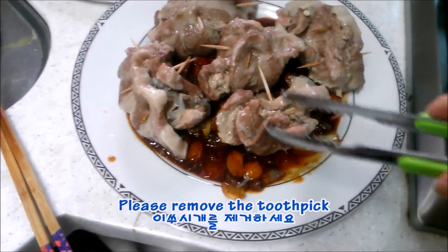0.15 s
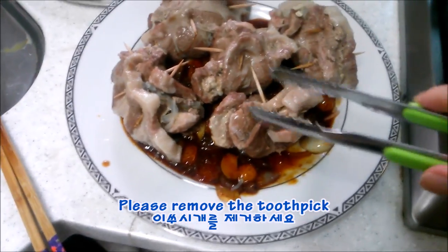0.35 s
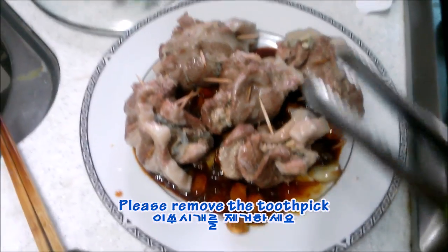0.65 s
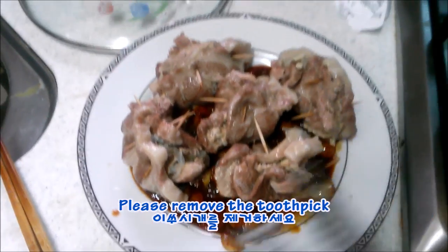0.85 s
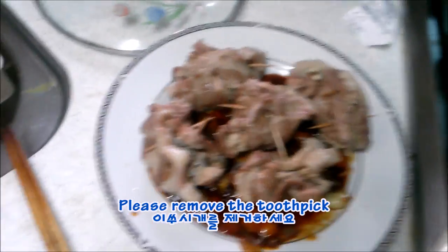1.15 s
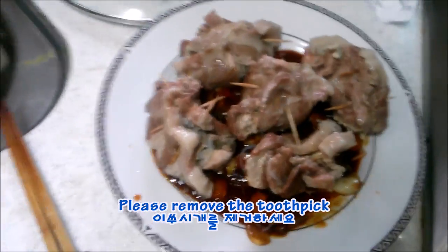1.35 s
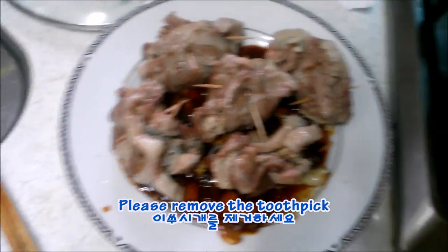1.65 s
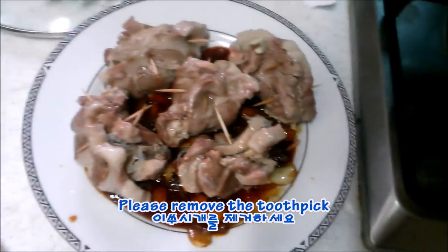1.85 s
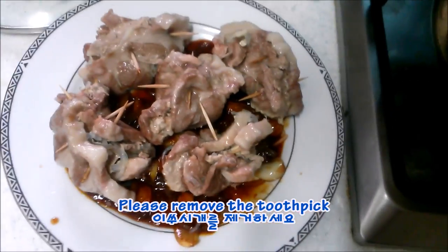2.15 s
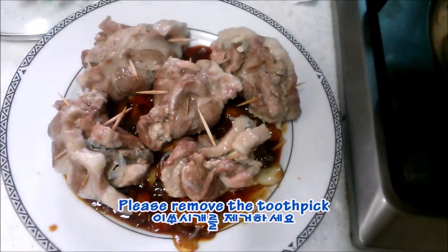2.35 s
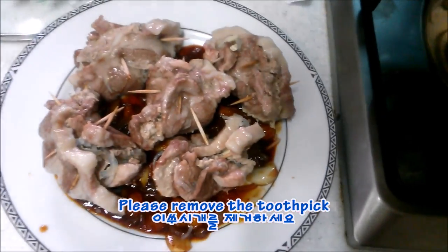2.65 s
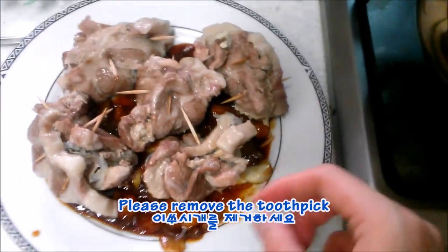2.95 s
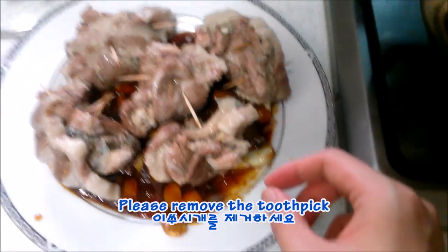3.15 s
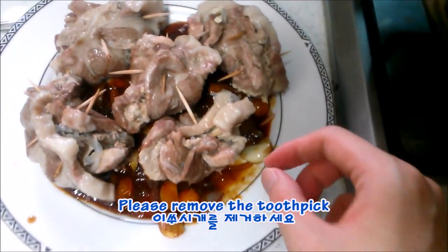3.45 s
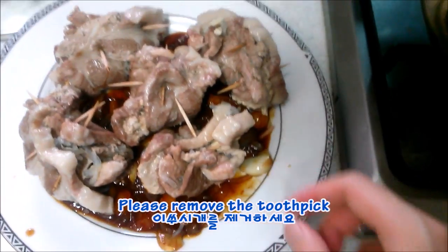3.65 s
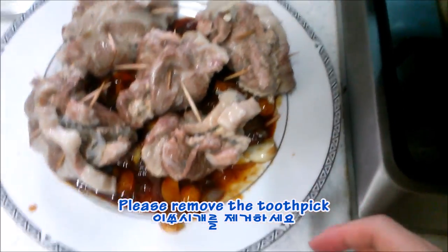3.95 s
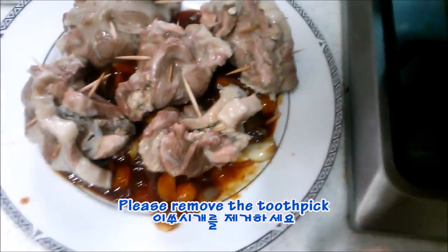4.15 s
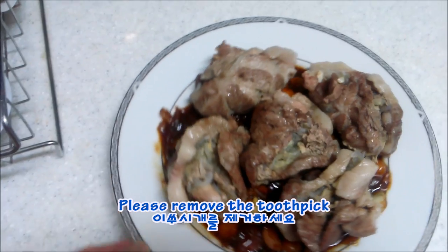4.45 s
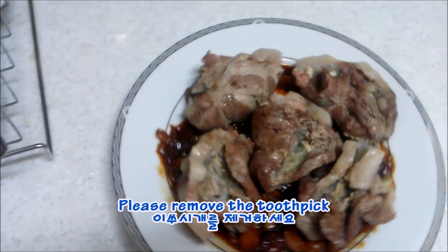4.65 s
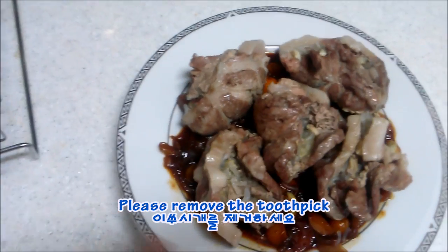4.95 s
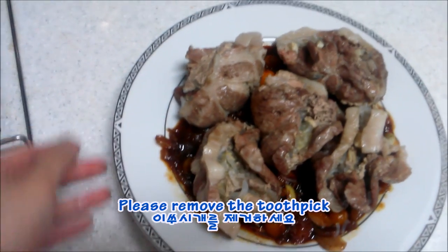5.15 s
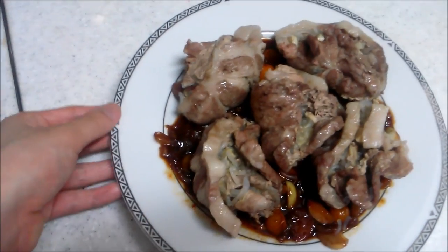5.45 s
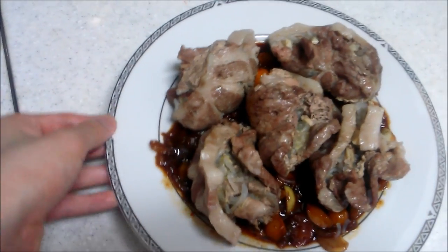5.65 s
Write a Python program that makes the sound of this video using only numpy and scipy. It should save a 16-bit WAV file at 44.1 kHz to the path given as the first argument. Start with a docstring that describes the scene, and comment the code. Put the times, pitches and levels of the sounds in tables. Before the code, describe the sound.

A small, hard-walled kitchen heard up close on a handheld microphone, with soft room air, low handling rumble and a very faint wavering appliance hum. At 0.2 s metal tongs give a faint springy click, and at 0.5 s they lightly nudge a dish. From 1.7 to 2.4 s they are laid aside in a light, uneven clatter that grows duller, with small clicks until 2.7 s. A quiet stretch follows. At about 4.15 s come loud dry pops with a low swing, then boxy knocks on the microphone's case; the hum vanishes. From 4.3 to 4.85 s a ceramic plate's rough foot grinds across the counter, with scratchy catches. Around 5.1 s it knocks hard several times, bright and short, with a thud. A hissing slide follows until 5.5 s, with two sharp rim taps at 5.3 s. Tiny scrapes at 5.6 and 5.76 s end it as the background fades.

```python
"""A small kitchen, close up: steel tongs click, nudge a dish and are laid aside with a light clatter
over an appliance hum. Dry pops and a low swing sound as the hum drops out, the microphone's case is knocked,
and a loaded ceramic plate is turned on the counter: its foot scrapes, catches, knocks and slides to rest.
Blows are filtered noise bursts, many with decaying modes; friction is noise modulated by random slips;
the hum is a set of wavering sines."""
import sys
import numpy as np
from scipy import signal
from scipy.fft import rfft, irfft
from scipy.io import wavfile
from scipy.ndimage import uniform_filter1d

SR = 44100
rng = np.random.default_rng(int(sys.argv[2]) if len(sys.argv) > 2 else 0)


def inscribe(sig):
    """Save sig as 16-bit PCM at rate SR to the path in sys.argv[1].

    A 1-D sig is mono; a 2-D sig holds one channel per row.
    Samples are clipped to [-1, 1] before scaling.
    """
    pcm = np.round(np.clip(np.atleast_2d(sig).T, -1, 1) * 32767)
    wavfile.write(sys.argv[1], SR, pcm.astype(np.int16))


N = 256485
T = np.arange(N) / SR  # s
AGE = T[:SR]  # time since a blow, s

# Spectrum of the room air. Each row: frequency in Hz, relative level in dB.
AIR_SPECTRUM = [(40, -21.5), (90, -0.5), (158, -7.5), (260, -8), (400, -8.5), (520, -14.5), (820, -15.5),
                (1100, -11), (1500, -16), (3000, -22), (6000, -29.5), (7600, -28.5), (10000, -41.5),
                (16000, -43.5)]
# Partials of the appliance hum. Each row: mean frequency in Hz, central level in dB.
HUM_PARTIALS = [(296, -78), (371, -71), (1104, -80), (1184, -85), (1287, -85), (2950, -87), (3009, -83)]
# Shifts of the hand that holds the microphone. Each row: middle in seconds, half length in seconds,
# rumble level in dB.
HAND_MOVES = [(0.43, 0.25, -53.5), (1.34, 0.36, -52.5), (2.146, 0.31, -49), (4.294, 0.21, -44),
              (5.193, .11, -46.5)]
# Spectrum of the handling rumble. Each row: frequency in Hz, relative level in dB.
RUMBLE_SPECTRUM = [(10, -4), (25, 6), (55, -5), (90, -17.5), (200, -22.5), (600, -51)]
HAND_REST_DB = -59  # rumble of the steady hand
RUSTLE_DB = -11  # airy rustle of a move, relative to its rumble
AIR_DB, AIR_SAG_DB_PER_S = -61.5, .5  # room air at the start, and its slow sinking
HUM_END_S, AIR_DROP_DB = 4.17, -2  # from here no hum is heard and the air is quieter
FADE_START_S, FADE_DB_PER_S = 5.46, 49  # the background dies away at the end

# Springy clicks of the tongs. Each row: start in seconds, level in dB, low-pass cutoff in Hz, T60 in seconds.
CLICKS = [(0.158, -48, 15000, 0.57), (1.972, -58.5, 11700, 0.58), (2.645, -60, 15400, 0.6),
          (2.717, -53, 7600, 0.64)]
# Spectrum of a click. Each row: frequency in Hz, relative level in dB.
CLICK_SPECTRUM = [(400, -18), (1100, -1), (2000, -2), (4500, -1.5), (6000, -3.5), (7600, 3), (9000, -3.5),
                  (10200, -9), (12000, -19), (16000, -20)]

# Tongs nudging the dish. Each row: start in seconds, level in dB, low-pass cutoff in Hz, T60 in seconds.
NUDGES = [(0.521, -53, 12000, 0.15), (0.528, -50, 9000, 0.2), (0.548, -52.5, 3060, 0.16)]
# Spectrum of a nudge. Each row: frequency in Hz, relative level in dB.
NUDGE_SPECTRUM = [(200, -29), (750, -1), (1050, -11), (1600, 5.5), (2250, -6), (3000, -8), (4500, -16),
                  (7500, -15.5), (10000, -27), (16000, -33)]
# Modes of the nudged dish. Each row: frequency in Hz, mean relative level in dB, free T60 in seconds.
NUDGE_MODES = [(806, -9, 0.22), (1630, -5, 0.22), (2086, 0, .2), (2305, -6, .15), (2835, -2, 0.11)]

# Tongs set down and rocking. Each row: start in seconds, level in dB, low-pass cutoff in Hz.
CLACKS = [(1.706, -36, 12100), (1.719, -35.5, 4900), (1.7806, -40.5, 3720), (1.799, -38, 1190),
          (1.8574, -42, 3120), (1.9288, -42, 2070), (1.945, -41, 1670), (1.9707, -39, 2400),
          (1.99, -41, 1280), (2.0714, -41, 2300), (2.089, -42, 1900), (2.128, -45, 900), (2.163, -44, 1300),
          (2.3358, -46.5, 1500), (2.3688, -42.5, 2030), (2.393, -41, 1180)]
# Spectrum of a clack. Each row: frequency in Hz, relative level in dB.
CLACK_SPECTRUM = [(120, -47), (220, -4.5), (310, -4.5), (520, -5.5), (660, -8), (1000, -6.5), (1300, -11),
                  (1700, -4), (2200, -11.5), (3100, -9), (3800, -16), (4600, -14.5), (7000, -17.5),
                  (16000, -40)]
# Modes of the tongs and their rest. Each row: mean frequency in Hz, mean relative level in dB,
# free T60 in seconds.
TONG_MODES = [(315, -4, .17), (463, -8, .17), (657, -5, .18), (708, -8, .15), (1060, -10, .1),
              (1565, -4, .09), (1712, -1, .07), (1946, 0, .08), (2060, -1, .08), (2336, -4, .08),
              (2692, -6, .1), (2900, -4, .07), (3074, -1, .08), (4398, -11, .11), (4721, -12, .11),
              (5125, -14, .08), (6842, -16, .08)]
CLACK_T60_S = .12

# Dry pops. Each row: start in seconds, level in dB, T60 of the fizz in seconds.
POPS = [(4.1263, -36.5, .008), (4.146, -17, 0.0047), (4.166, -8.5, 0.012)]
# Spectrum of a pop. Each row: frequency in Hz, relative level in dB.
POP_SPECTRUM = [(200, -10), (1500, -3), (2500, -10), (3800, 2), (7000, -2), (10000, -13.5), (16000, -15)]

# Knocks on the microphone's case. Each row: start in seconds, level in dB, low-pass cutoff in Hz,
# T60 in seconds.
CASE_KNOCKS = [(4.178, -18.5, 14000, 0.045), (4.186, -22.5, 11000, 0.28), (4.222, -22, 9000, 0.1),
               (4.229, -26.5, 6000, 0.18), (4.243, -25.5, 12500, 0.21), (4.267, -33, 1510, 0.29)]
# Spectrum of a case knock. Each row: frequency in Hz, relative level in dB.
CASE_SPECTRUM = [(25, -18), (60, 0.5), (112, 5.5), (150, -14), (190, -5), (270, -12), (330, -3.5),
                 (400, -14.5), (760, -6.5), (1300, -15.5), (2200, -16), (4500, -14.5), (8000, -18.5),
                 (11000, -32), (16000, -39)]
# Modes of the case. Each row: mean frequency in Hz, mean relative level in dB, free T60 in seconds.
CASE_MODES = [(100, -1, .16), (121, -1, .18), (188, 0, .22), (232, -2, .2), (319, -1, .22), (360, -7, .16),
              (410, -8, .15), (469, -3, .22), (553, -4, .22), (650, -9, .15), (721, -7, .18),
              (744, -8, .16), (879, -6, .19), (917, -7, .22), (995, -10, .17), (1184, -9, .22),
              (1270, -12, .18), (1389, -12, .22)]

# Pushes that slide the plate. Each row: start in seconds, length in seconds, grinding level in dB,
# hiss level in dB, easing of the grinding in dB per second.
PUSHES = [(4.288, 0.57, -49.5, -54, 4), (4.955, 0.16, -81, -72.5, 20), (5.153, 0.38, -55, -48, 22),
          (5.59, 0.041, -64.5, -54, 32), (5.759, .035, -70, -63.5, 18)]
PUSH_ATTACK_DB_PER_S, PUSH_RELEASE_DB_PER_S = 296, 218
GRIT_EASING_DB_PER_S = 20  # the hiss thins as a push goes on
# Spectrum of the grinding body. Each row: frequency in Hz, relative level in dB.
GRIND_SPECTRUM = [(100, -8), (260, -7), (480, -11.5), (800, -1.5), (1150, -9.5), (1500, 5), (2200, -5.5),
                  (2650, -7.5), (3200, -7), (6000, -13), (9000, -30), (16000, -30)]
# Spectrum of the gritty hiss. Each row: frequency in Hz, relative level in dB.
GRIT_SPECTRUM = [(2500, -37), (4500, -1), (6500, 1), (8500, 0), (10500, -9.5), (13000, -14.5), (16000, -19)]
# Resonances that the sliding foot excites. Each row: frequency in Hz, width in Hz, central relative level in dB.
SLIDE_PEAKS = [(1500, 100, -2), (2180, 400, -2.5), (2680, 150, -7), (3690, 260, -1), (4810, 230, -3),
               (5830, 140, -7), (7100, 160, -4), (8570, 130, -6), (10100, 350, -27)]
SLIDE_SWELL_DB = 2.8  # rms swing of each resonance

# The foot catching on grit. Each row: start in seconds, level in dB, low-pass cutoff in Hz, T60 in seconds.
CATCHES = [(4.417, -41.5, 13870, 0.044), (4.4592, -39, 14000, 0.13), (4.5101, -36.5, 9000, 0.094),
           (4.521, -39, 8000, 0.072), (4.8448, -37, 3500, 0.12), (4.876, -43.5, 8900, 0.17)]
# Spectrum of a catch. Each row: frequency in Hz, relative level in dB.
CATCH_SPECTRUM = [(470, -31), (800, -6), (2070, -2.5), (2630, -4.5), (3340, 1), (5380, -13), (6570, 2.5),
                  (9450, -3), (16000, -18)]

# Knocks of the foot on the counter. Each row: start in seconds, level in dB, low-pass cutoff in Hz,
# T60 in seconds.
KNOCKS = [(5.0928, -21.5, 14000, 0.23), (5.1045, -23.5, 7000, 0.11), (5.121, -25.5, 8000, 0.11),
          (5.147, -23, 10100, 0.048), (5.157, -33, 1780, 0.057)]
# Spectrum of a knock. Each row: frequency in Hz, relative level in dB.
KNOCK_SPECTRUM = [(120, -27), (300, -18), (600, -13.5), (950, -18), (1330, -7), (1900, -23), (2500, -12),
                  (3250, -5), (4000, -16), (7000, -13), (9500, -24), (13000, -36), (15200, -19),
                  (16000, -30)]
# Modes of the plate. Each row: mean frequency in Hz, mean relative level in dB struck at the foot,
# the same struck at the rim, free T60 in seconds.
PLATE_MODES = [(590, -13, -22, .12), (845, -12, -14, .11), (1120, -16, -5, .13), (1193, -7, -8, .13),
               (1290, -6, -13, .13), (1371, -5, -5, .12), (1470, -8, -16, .11), (1700, -15, -11, .1),
               (2180, -11, -20, .14), (2386, -10, -16, .1), (2555, -11, -16, .1), (2675, -12, -1, .13),
               (2922, -6, -8, .16), (3135, -1, -5, .11), (3219, -4, -14, .12), (3310, -5, -17, .09),
               (3444, -3, -17, .12), (3941, -9, -12, .17), (4174, -13, -8, .12), (4442, -9, -15, .15),
               (4714, -7, -17, .13), (5020, -8, -13, .14), (5196, -18, -8, .1), (5474, -8, -20, .15),
               (5600, -10, -22, .1), (5965, -9, -11, .14), (6365, -12, -20, .13), (6765, -11, -9, .14),
               (7149, -9, -16, .12), (7806, -11, -25, .1)]
# The counter taking the plate's weight. Each row: start in seconds, level in dB, low-pass cutoff in Hz,
# T60 in seconds.
THUDS = [(5.146, -32.5, 1580, 0.11), (5.158, -32, 1500, 0.12), (5.187, -37.5, 350, 0.14)]
# Spectrum of a thud. Each row: frequency in Hz, relative level in dB.
THUD_SPECTRUM = [(40, -12), (95, -1), (200, -8), (400, -10), (700, -11.5), (1300, -5.5), (2500, -9.5),
                 (8000, -44)]
# Modes of the counter. Each row: mean frequency in Hz, mean relative level in dB, free T60 in seconds.
COUNTER_MODES = [(188, -2, 0.13), (221, -6, 0.25), (267, -5.5, 0.14), (362.6, 2.5, 0.12), (428, 1, 0.11)]
# Taps on the plate's rim. Each row: start in seconds, level in dB, low-pass cutoff in Hz, T60 in seconds.
RIM_TAPS = [(5.2928, -24, 9500, 0.047), (5.302, -27.5, 3920, 0.063), (5.4035, -51.5, 4080, 0.62)]
# Spectrum of a rim tap. Each row: frequency in Hz, relative level in dB.
RIM_SPECTRUM = [(120, -58), (200, -12), (950, -15), (1140, -25), (1590, -12), (1840, -7), (2210, -15.5),
                (2700, 3), (3490, -7), (6880, -7), (16000, -59)]

TOP_HZ = 15900  # upper limit of the recorder


def undb(db):
    """Level: an amplitude gain is ten to the power of decibels over twenty."""
    return 10 ** (np.asarray(db) / 20)


def unit(x):
    """Normalisation: dividing by the root mean square gives an rms of 1."""
    return x / np.sqrt(np.mean(x ** 2))


def fade(t60):
    """Damping: amplitude decays exponentially, by 60 dB in t60 seconds."""
    return np.exp(-np.log(1000) * AGE / max(t60, 1e-3))


def add(out, start, x):
    """Superposition: x is summed into out from start seconds."""
    first = int(start * SR)
    out[first:first + len(x)] += x[:N - first]


def colour(x, points):
    """Minimum-phase filtering: the spectrum is imposed causally and keeps the power of white noise."""
    size = 4096
    hz, db = np.transpose(points)
    bin_hz = np.arange(size // 2 + 1) * SR / size
    gain = unit(undb(np.interp(np.log(bin_hz + 1), np.log(hz), db)))
    # folding the cepstrum onto positive time gives the minimum-phase response
    cepstrum = irfft(np.log(gain))
    cepstrum[1:size // 2] *= 2
    cepstrum[size // 2 + 1:] = 0
    response = irfft(np.exp(rfft(cepstrum)))
    return signal.fftconvolve(x, response)[:len(x)]


def lowpass(x, hz, order=3):
    """Low-pass filtering: a Butterworth slope takes off the treble above hz."""
    return signal.sosfilt(signal.butter(order, min(hz, SR / 2 - 1000), fs=SR, output="sos"), x)


def walk(rate):
    """Random modulation: smoothed random steps, rate per second, drift with an rms of 1."""
    hold = int(SR / rate)
    steps = np.repeat(rng.standard_normal(N // hold + 2), hold)
    return unit(uniform_filter1d(steps, hold)[:N])


def background():
    """Steady sources: noise for air, wavering sines for hum; hand moves add rumble and rustle."""
    moves = sum(undb(db) * np.exp(-((T - middle) / half) ** 2) for middle, half, db in HAND_MOVES)
    hum_gain = np.clip((HUM_END_S - T) * 20, 0, 1)  # falls to nothing in 50 ms
    room = undb(AIR_DB - AIR_SAG_DB_PER_S * T + AIR_DROP_DB * (1 - hum_gain))
    # independent noises add in power
    air_level = np.hypot(room, undb(RUSTLE_DB) * moves) * undb(.5 * walk(7.63))
    air = colour(rng.standard_normal(N), AIR_SPECTRUM) * air_level
    rumble = unit(colour(rng.standard_normal(N), RUMBLE_SPECTRUM)) * np.hypot(undb(HAND_REST_DB), moves)
    hum = np.zeros(N)
    for hz, db in HUM_PARTIALS:
        level = undb(db + 2 * walk(2.946)) * np.sqrt(2)
        phase = 2 * np.pi * np.cumsum(hz * (1 + 0.0031 * walk(20))) / SR
        hum += level * np.sin(phase)
    ending = undb(-FADE_DB_PER_S * np.maximum(T - FADE_START_S, 0))
    return (air + rumble + hum * hum_gain) * ending


def ring(modes, damping, detune):
    """Modal vibration: decaying sines, reweighted and slightly detuned by each point of contact."""
    hz, db, t60 = np.transpose(modes)
    chance = rng.standard_normal((len(hz), 3))  # weight, phase, tuning
    size = undb(db + 1.9 * chance[:, 0])
    size = size / np.sqrt(np.sum(size ** 2) / 2)  # unit power at the onset
    hz = hz * (1 + detune * chance[:, 2])
    return sum(a * fade(d / damping) * np.sin(2 * np.pi * (f * AGE + p))
               for f, a, d, p in zip(hz, size, t60, chance[:, 1]))


def blows(rows, spectrum, crack_db, modes=(), ring_db=0, free_t60=.1, detune=0):
    """Impact: a dense crack plus ringing modes; soft contact dulls it, a pressing hand shortens it."""
    out = np.zeros(N)
    for start, db, cutoff_hz, t60 in rows:
        body = undb(crack_db) * colour(rng.standard_normal(SR) * fade(t60), spectrum)
        if len(modes):
            # modes keep their free decay when the blow's t60 equals free_t60
            body = body + undb(ring_db) * ring(modes, free_t60 / t60, detune)
        add(out, start, undb(db) * lowpass(body, cutoff_hz))
    return out


def tong_clicks():
    """Spring release: each click is a decaying burst of coloured noise."""
    return blows(CLICKS, CLICK_SPECTRUM, crack_db=0)


def dish_nudges():
    """Light impact: the tongs excite a few modes of the dish."""
    return blows(NUDGES, NUDGE_SPECTRUM, crack_db=0.5, modes=NUDGE_MODES, ring_db=-1.0, free_t60=0.38)


def kitchen(x, wet_db, t60):
    """Reverberation: hard tiled walls add a short bright tail of decaying noise."""
    tail = lowpass(rng.standard_normal(SR), 12500) * fade(t60) * np.minimum(AGE / 0.0031, 1)
    tail = tail / np.sqrt(np.sum(tail ** 2))
    return x + undb(wet_db) * signal.fftconvolve(x, tail)[:N]


def tong_clatter():
    """Repeated impact: the rocking tongs and their rest ring anew at every contact."""
    rows = [(*row, CLACK_T60_S) for row in CLACKS]
    return blows(rows, CLACK_SPECTRUM, crack_db=-4.5, modes=TONG_MODES, ring_db=-2.5,
                 free_t60=0.11, detune=0.0198)


def swing_and_pops(start, db, period, fizz_db):
    """Transients: one slow, heavily damped swing of the signal, and dry pops of an impulse with fizz."""
    out = np.zeros(N)
    phase = AGE / period
    add(out, start, -undb(db) * np.sin(2 * np.pi * phase) * np.exp(-2 * phase))
    for pop_start, pop_db, t60 in POPS:
        spike = (AGE == 0) + undb(fizz_db) * rng.standard_normal(SR) * fade(t60)
        add(out, pop_start, undb(pop_db) * colour(spike, POP_SPECTRUM))
    return out


def case_knocks():
    """Structure-borne impact: knocks on the microphone's case excite its low modes."""
    return blows(CASE_KNOCKS, CASE_SPECTRUM, crack_db=-2.5, modes=CASE_MODES, ring_db=-5.5,
                 free_t60=0.16, detune=0.0031)


def push(start, length, db, easing):
    """Sliding envelope: gain builds quickly, eases off while the plate moves, then stops."""
    early, late = np.maximum(start - T, 0), np.maximum(T - start - length, 0)
    eased = easing * np.clip(T - start, 0, length)
    return undb(db - PUSH_ATTACK_DB_PER_S * early - eased - PUSH_RELEASE_DB_PER_S * late)


def scrape(grind_db, peaks_db, grit_db, grain_db, judder_db):
    """Friction: tiny slips of the unglazed foot feed a grinding body, resonances and a gritty hiss."""
    judder = undb(judder_db * walk(60))
    slips = [rng.standard_normal(N) * undb(grain_db * walk(1500)) * judder for _ in range(3)]
    # each resonance swells and sinks as the point of contact travels round the foot
    peaks = np.zeros(N)
    for hz, width, db in SLIDE_PEAKS:
        resonance = signal.lfilter(*signal.iirpeak(hz, hz / width, fs=SR), slips[0])
        peaks += undb(db + SLIDE_SWELL_DB * walk(11)) * resonance
    grind = undb(grind_db) * unit(colour(slips[1], GRIND_SPECTRUM))
    grind += undb(peaks_db) * unit(lowpass(peaks, 8500))
    # about 22 times a second, at random, a coarser grain is crushed in a short scratch
    coarse = (rng.random(N) < 22 / SR) * rng.exponential(0.79, N)
    scratches = 1 + signal.fftconvolve(coarse, fade(0.053))[:N]
    grit = undb(grit_db) * unit(colour(slips[2] * scratches, GRIT_SPECTRUM))
    out = np.zeros(N)
    for start, length, low_db, high_db, easing in PUSHES:
        out += grind * push(start, length, low_db, easing)
        out += grit * push(start, length, high_db, GRIT_EASING_DB_PER_S)
    return out


def foot_catches():
    """Stick and release: each catch on grit is a decaying burst of coloured noise."""
    return blows(CATCHES, CATCH_SPECTRUM, crack_db=-2.5)


def plate():
    """Point of excitation: foot and rim weight the plate's modes differently; the counter thuds."""
    hz, foot_db, rim_db, t60 = np.transpose(PLATE_MODES)
    foot = blows(KNOCKS, KNOCK_SPECTRUM, crack_db=-7.0, modes=np.c_[hz, foot_db, t60], ring_db=-2.1,
                 free_t60=0.14, detune=0.0013)
    counter = blows(THUDS, THUD_SPECTRUM, crack_db=2.5, modes=COUNTER_MODES, ring_db=-4.5,
                    free_t60=0.1, detune=0.029)
    rim = blows(RIM_TAPS, RIM_SPECTRUM, crack_db=-2, modes=np.c_[hz, rim_db, t60], ring_db=-7.0,
                free_t60=.11)
    return foot + counter + rim


def scene():
    """Superposition: all sources add; the nudges, the clatter and the plate's blows also reverberate."""
    steady = background()
    clicks = tong_clicks()
    tongs = kitchen(dish_nudges() + tong_clatter(), wet_db=-10, t60=0.55)
    near = swing_and_pops(start=4.126, db=-21.5, period=0.037, fizz_db=-14.0) + case_knocks()
    sliding = scrape(grind_db=-2.5, peaks_db=-2.0, grit_db=0.5, grain_db=1, judder_db=1.5) + foot_catches()
    knocking = kitchen(plate(), wet_db=-13.5, t60=0.4)
    return (steady + clicks + tongs + near + sliding + knocking)[None]


def record(dry):
    """Band limiting: the recorder cuts the top with a steep elliptic low-pass."""
    return signal.sosfilt(signal.ellip(10, .2, 70, TOP_HZ, fs=SR, output="sos"), dry)


dry = scene()
out = record(dry)
inscribe(out)
```